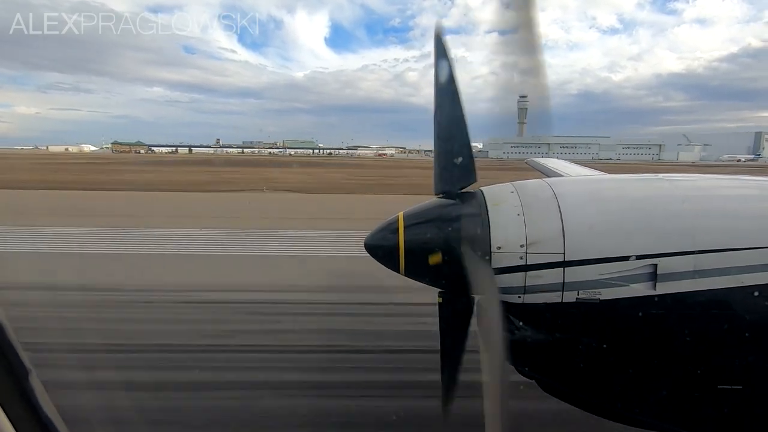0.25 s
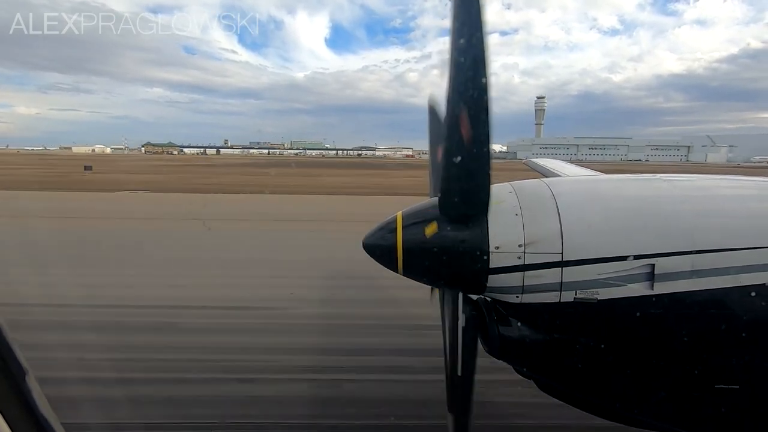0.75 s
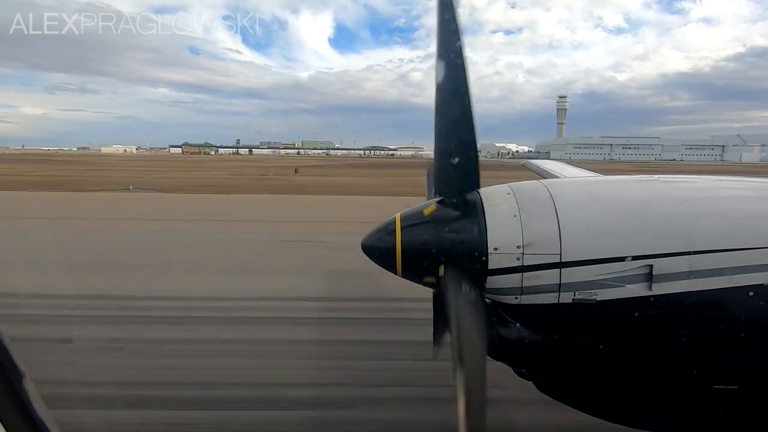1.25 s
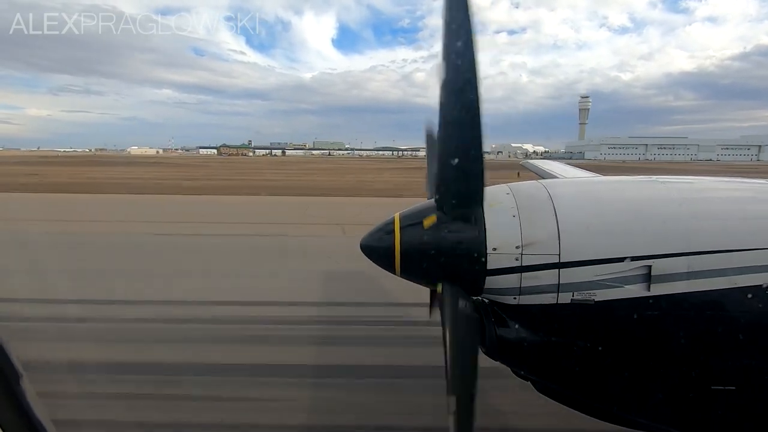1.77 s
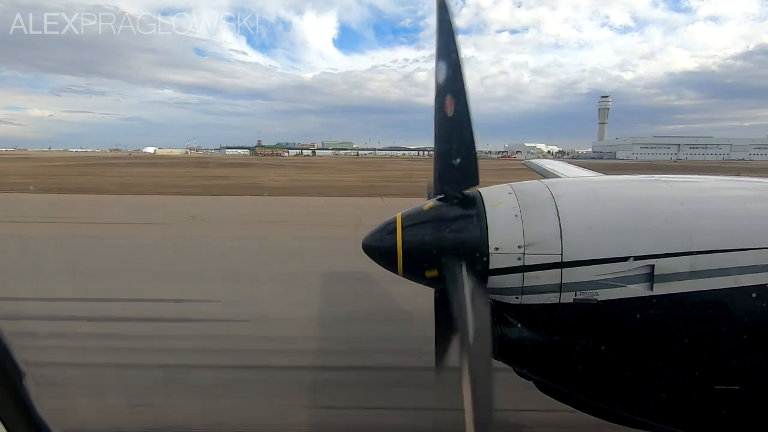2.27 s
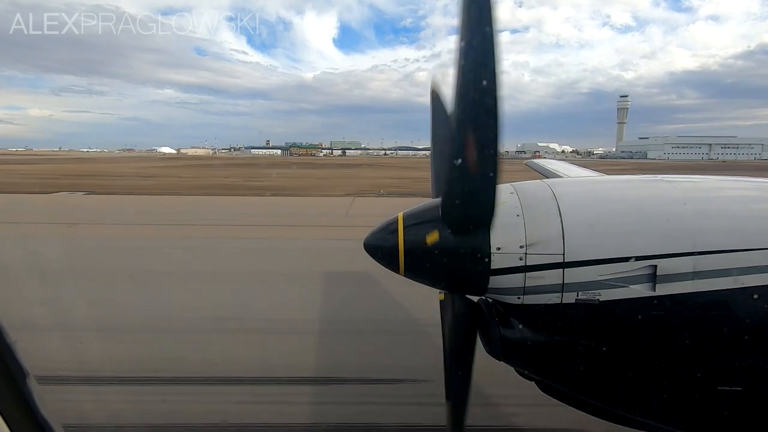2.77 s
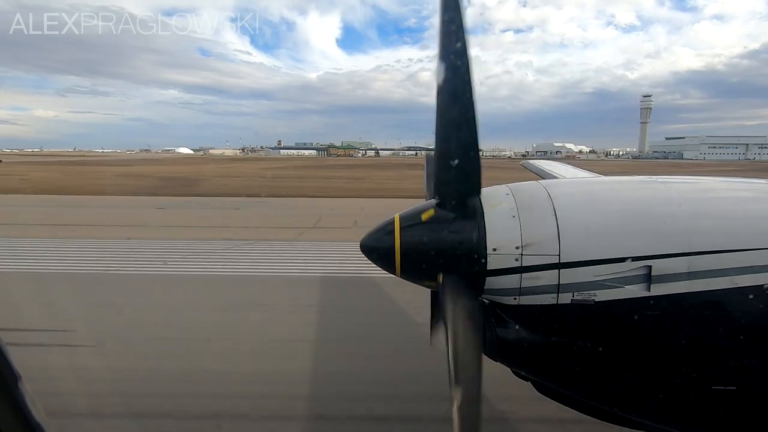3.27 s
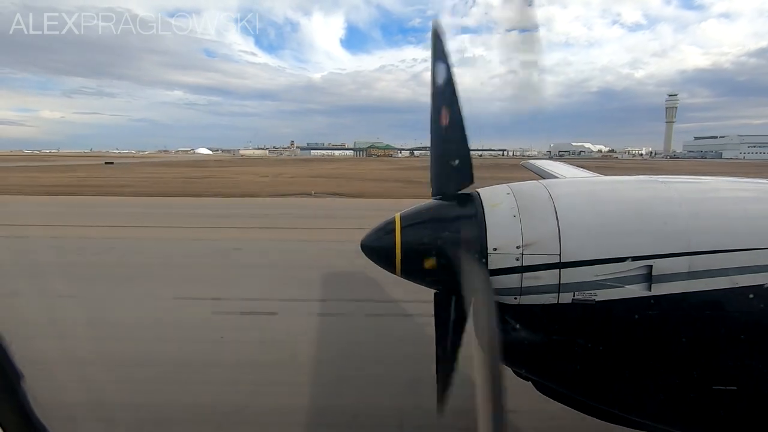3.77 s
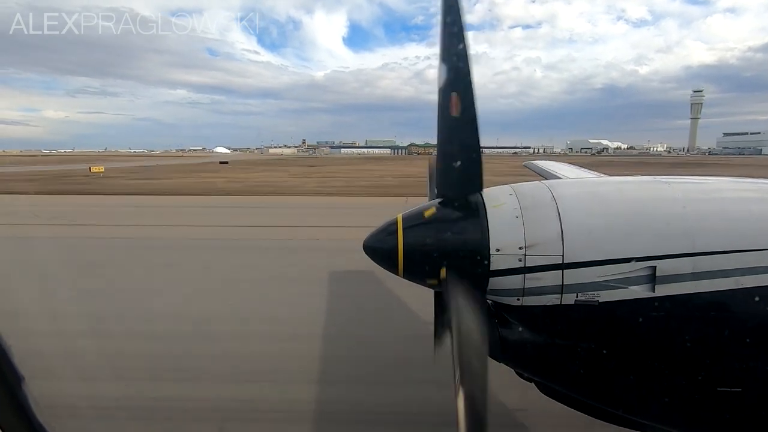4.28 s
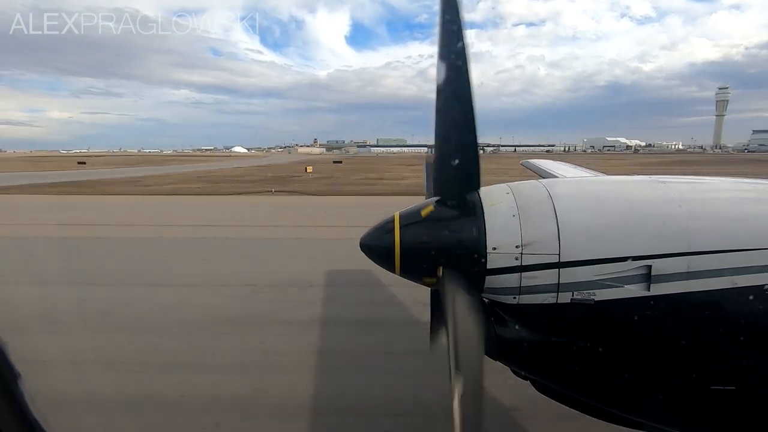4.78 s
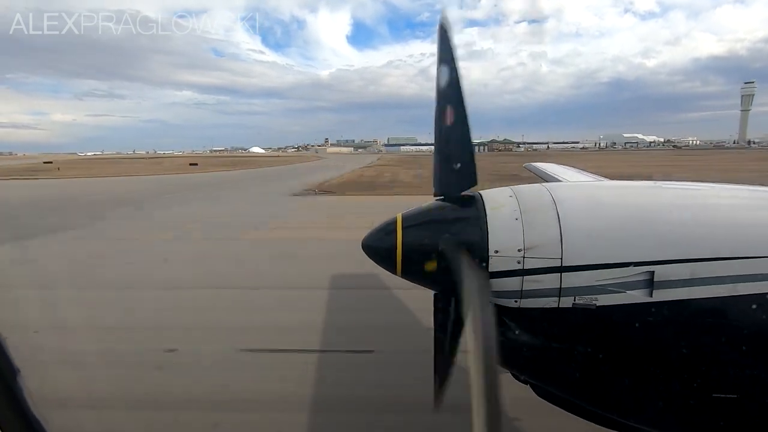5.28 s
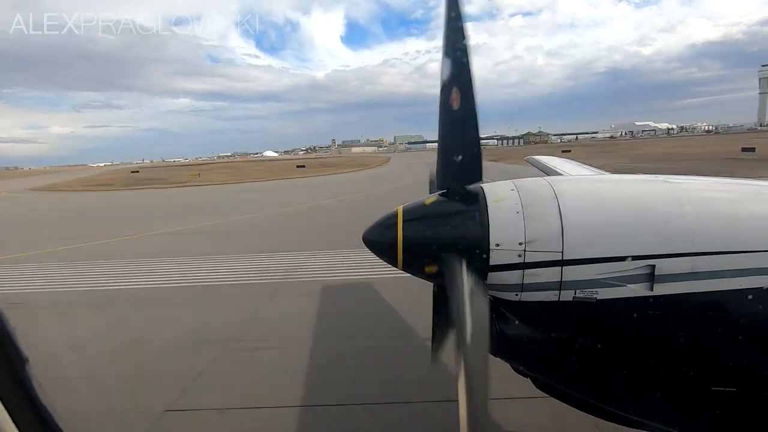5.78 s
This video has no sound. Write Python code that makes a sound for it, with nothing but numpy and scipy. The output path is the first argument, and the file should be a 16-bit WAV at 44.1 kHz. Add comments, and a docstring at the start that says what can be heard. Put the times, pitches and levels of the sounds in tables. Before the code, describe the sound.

Inside a taxiing twin turboprop, a loud, even propeller hum carries on above a low rumble and a soft hiss of air.

```python
"""A twin turboprop taxis at steady power, heard from the cabin beside one four-bladed propeller.
From the start blade pulses drum on the fuselage, the far propeller beats faintly against them, wheels
rumble and prop wash roars through the skin and hisses over the window in puffs. The trim buzzes at 0.2 s
and ticks at 0.5 s. Around 3 s the wash eases and a faint turbine whine comes through; near 4 s the wash
swells again, and the trim ticks once more at 4.9 s while the drone carries on."""
import sys
import numpy as np
from scipy import signal
from scipy.fft import rfft, irfft, next_fast_len
from scipy.io import wavfile
from scipy.ndimage import uniform_filter1d

SR = 44100
rng = np.random.default_rng(int(sys.argv[2]) if len(sys.argv) > 2 else 0)


def unload_wav(signal):
    """Save mono or channel-first audio to the path in sys.argv[1] as 16-bit WAV at rate SR, clipped to [-1, 1]."""
    wavfile.write(
        sys.argv[1],
        SR,
        np.round(np.clip(np.atleast_2d(signal).T, -1, 1) * 32767).astype(np.int16),
    )


N = 266364


# The near propeller's speed. Each row: time in seconds, blade passes per second.
BLADE_RATE = [(0, 92.57), (0.65, 92.73), (1, 92.54), (2.1, 92.48), (2.65, 92.88), (3.1, 92.57), (4, 92.51),
              (4.4, 91.88), (4.85, 91.98), (5.45, 92.83), (6.04, 92.15)]

def propellers():
    """Near blade rate in Hz, then running counts of near and far blade passes."""
    blade_hz = curve(BLADE_RATE)
    passes = 0.525 + np.cumsum(blade_hz) / SR   # the window starts between two blades
    hunting_hz = 0.38 * drift(0.4)   # the far engine hunts around the same speed
    return blade_hz, passes, passes + np.cumsum(hunting_hz) / SR


# Fader rides for the drone's partials 2, 3 and 4. Each row: time in seconds, relative level in dB.
SECOND_PARTIAL = [(0.0, -18.7), (0.94, -17), (1.59, -16.5), (2.08, -15), (2.65, -18.0), (4.45, -18),
                  (4.61, -17.5), (5.8, -18.5), (6.0, -21)]
THIRD_PARTIAL = [(0.0, -29.5), (0.24, -26), (0.73, -30.5), (1.55, -26.5), (1.88, -30.5), (2.12, -25.5),
                 (2.33, -25), (2.65, -29), (3.47, -27.5), (3.71, -25), (4.29, -29), (5.47, -25.0),
                 (6.0, -29)]
FOURTH_PARTIAL = [(0.0, -51.5), (1.14, -37), (1.47, -47.5), (1.96, -41), (3.35, -40), (3.92, -46.0),
                  (4.33, -56.7), (4.65, -42.5), (5.59, -57), (6.0, -39)]

def blade_drone(passes, flutter_db):
    """Each blade sends a pressure pulse; gusts shake its higher partials the most."""
    mean_hz = passes[-1] * SR / N
    rides = (SECOND_PARTIAL, THIRD_PARTIAL, FOURTH_PARTIAL)
    second, third, fourth = (curve(ride) + 0.2 for ride in rides)   # the cabin lifts these a little
    first = -12.5 - 0.47 * (second - second.mean())   # the fundamental ducks as the second grows
    drone = np.zeros(N)
    for k, db in enumerate((first, second, third, fourth), 1):
        gain = from_db(db + k * flutter_db * drift(27))
        drone += gain * tone(k * passes - cabin_lag(k * mean_hz))
    return drone


def cabin_lag(hz, mode_hz=216, width_hz=24):
    """Share of a cycle by which the cabin's air mode delays tones below it and advances those above."""
    return np.arctan(width_hz / 2 / (mode_hz - hz)) / np.pi


# Each propeller's faint tones. Each row: multiple of the shaft speed, relative level in dB.
SHAFT_TONES = [(1, -46.5), (2, -40), (3, -46.5), (6, -52), (11, -53), (20, -54), (24, -52.5), (32, -57),
               (40, -67.5), (44, -71), (56, -72.5)]

def shaft_hum(passes, waver_db, smear_cycles, blades=4):
    """Slightly unequal blades add weak, wavering tones at multiples of the shaft speed."""
    hum = np.zeros(N)
    for order, db in SHAFT_TONES:
        gain = from_db(db + waver_db * drift(0.83))
        hum += gain * tone(round(order) * passes / blades + smear_cycles * drift(6.6) + rng.random())
    return hum


# The pavement's roughness. Each row: time in seconds, relative rumble level in dB.
ROUGHNESS = [(0, -31), (0.75, -29.5), (1, -25.5), (1.3, -31.5), (1.65, -24.5), (2.2, -25), (3.1, -30),
             (3.4, -37.4), (4.2, -30.5), (5.6, -32.5), (6.04, -36.5)]
# The airframe's low resonances. Each row: pitch in Hz, width in Hz, gain in dB.
AIRFRAME_MODES = [(29.7, 3.3, -0.5), (45.4, 8.1, 0.5), (57.3, 18, -5.5)]

def wheels():
    """Rough pavement shakes the airframe: gives the rumble and its swing in dB about the average."""
    rough_db = curve(ROUGHNESS)
    shaking = resonate(noise([(16, 0), (65, 0)]), AIRFRAME_MODES)
    envelope = uniform_filter1d(shaking ** 2, size=SR // 4) ** 0.5
    steady = shaking / envelope   # the surface is even, with no single big bump
    return from_db(rough_db - 1.2) * steady, rough_db - rough_db.mean()


# The prop wash's strength on the window. Each row: time in seconds, relative level in dB.
WASH_RIDE = [(0, -52.5), (0.25, -53), (0.65, -56), (1.4, -54.5), (1.9, -55.0), (2.45, -57.5), (3.55, -57.5),
             (3.95, -53.9), (5.45, -55.5), (5.75, -56.5), (6.04, -56.5)]

def wash_surge():
    """The prop wash swells and eases, in dB about its average."""
    wash_db = curve(WASH_RIDE)
    return wash_db - wash_db.mean()


# EQ curves for the air, darkest to brightest. Each row: frequency in Hz, relative level in dB.
BOOM_EQ = [(25, -14.5), (60, -3.5), (110, 2), (150, -4.5), (195, -2), (240, -7), (330, -12.5), (430, -27),
           (600, -45)]
ROAR_EQ = [(250, -12), (370, 1.5), (440, -2), (550, 0), (650, 0.5), (730, -6.5), (820, -12), (940, -9.5),
           (1100, -14.5), (1400, -24.5), (2500, -43)]
HISS_EQ = [(700, -10.5), (1200, 1.5), (1650, 1), (2100, -1), (2600, -1.5), (3250, -3.5), (3600, -7.5),
           (5000, -16.5), (7000, -28), (10000, -40)]
SEAL_EQ = [(2500, -20), (3800, -5.5), (4300, 2.5), (4700, -3), (5000, -3.5), (5450, -10.5), (6200, -11.5),
           (7000, -18), (9000, -13), (10200, -34.5), (13000, -29), (15000, -42)]
SIZZLE_EQ = [(4000, -14), (6000, -4.5), (7200, -5.5), (7900, -1), (9300, -3), (10100, -15), (10700, -11),
             (11400, -19.5), (12800, -15.5), (15000, -30.5)]

def prop_wash(passes, surge_db, bumps_db):
    """Wash booms and roars through the skin; the window seal hisses twice in each pressure cycle."""
    gust = from_db(0.7 * drift(7.2))   # eddies in the wash stir all the hiss together
    boom = from_db(-32.5) * noise(BOOM_EQ)
    roar = from_db(-43 + 0.5 * surge_db + 0.12 * bumps_db) * noise(ROAR_EQ)   # rough pavement adds roar
    roar *= puffs(passes, lag=1.0, sharpness=1.3, depth=0.12)
    hiss = from_db(-56 + surge_db) * noise(HISS_EQ)
    hiss *= puffs(passes, lag=0.41, sharpness=0.6, depth=0.11)
    seal = from_db(-66.5 + 1.25 * surge_db) * noise(SEAL_EQ)
    seal *= puffs(passes, lag=0.41, sharpness=3, depth=0.65)
    grain = from_db(1.1 * drift(120))
    sizzle = from_db(-73.1 + 1.3 * surge_db) * noise(SIZZLE_EQ) * grain
    sizzle *= puffs(passes, lag=0.73, sharpness=5.5, depth=1.0)
    return boom + roar + gust * (hiss + seal + sizzle)


def puffs(passes, lag, sharpness, depth):
    """Unit-power tremolo with one swell per blade, `lag` cycles after the blade passes."""
    swell = np.exp(sharpness * (np.cos(2 * np.pi * (passes - lag)) - 1))
    return rms_one(1 + depth * swell)


# Cues for the loose trim; the shortest are single ticks.
# Each row: start in seconds, length in seconds, opening drive in dB.
BUZZ_CUES = [(0.208, 0.07, -45.5), (0.499, 0.005, -45.5), (4.914, 0.005, -53)]
# The trim's bright ring. Each row: pitch in Hz, width in Hz, gain in dB.
TRIM_MODES = [(2700, 900, 2), (4470, 700, 4.5), (6100, 520, 1), (8000, 600, 1), (9000, 690, -3.5)]

def trim_buzz(blade_hz, chatter_s, uneven_db, fade_db_per_s):
    """While a panel is loose each blade pulse makes it chatter for a few milliseconds, fading away."""
    t, force = np.arange(N) / SR, np.zeros(N)
    for start, length, db in BUZZ_CUES:
        for age in np.arange(0, length, 1 / blade_hz):
            touch = from_db(db - fade_db_per_s * age + uneven_db * rng.standard_normal())
            force += touch * (t >= start + age) * np.exp(-np.abs(t - start - age) / chatter_s)
    ringing = resonate(force * rng.standard_normal(N), TRIM_MODES)
    return signal.sosfilt(signal.butter(6, 9600, fs=SR, output="sos"), ringing)


# The compressors' tones. Each row: pitch in Hz, level in dB in an average wash, wander as a share of pitch.
COMPRESSOR_TONES = [(8495, -86.5, .0015), (8900, -91, .003)]

def turbine(surge_db, waver_db):
    """The compressors' thin whines barely get through the window, most when the wash eases."""
    whines = np.zeros(N)
    for hz, db, wander in COMPRESSOR_TONES:
        gain = from_db(db + waver_db * drift(4.3))
        pitch_hz = hz * (1 + wander * drift(25))
        whines += gain * tone(np.cumsum(pitch_hz) / SR)
    return from_db(-1.9 * surge_db) * whines


def from_db(db):
    """Decibels to gain."""
    return 10 ** (np.asarray(db) / 20)


def rms_one(x):
    """Scale to unit power."""
    return x / np.sqrt(np.mean(x ** 2) + 1e-20)


def curve(rows):
    """Automation line through (seconds, value) points, a value for every sample."""
    return np.interp(np.arange(N) / SR, *np.transpose(rows))


def tone(cycles):
    """Unit-power sinusoid from a count of cycles."""
    return np.sqrt(2) * np.cos(2 * np.pi * cycles)


def drift(rate_hz):
    """Smooth random wander with spread 1."""
    hop, settle = 40, 2000
    pole = np.exp(-2 * np.pi * rate_hz * hop / SR)
    white = rng.standard_normal(N // hop + settle + 2)
    slow = signal.lfilter([1], [1, -2 * pole, pole * pole], white)[settle:]
    return np.interp(np.arange(N) / hop, np.arange(len(slow)), rms_one(slow))


def noise(eq):
    """Unit-power noise shaped by an EQ curve, falling away steeply past its ends."""
    hz, db = np.transpose(eq)
    size = next_fast_len(N)
    bins_hz = np.maximum(np.arange(size // 2 + 1) * SR / size, 1)
    colour = from_db(np.interp(np.log(bins_hz), np.log(hz), db))
    skirts = np.minimum(1, np.minimum(bins_hz / hz[0], hz[-1] / bins_hz)) ** 3
    spectrum = rfft(rng.standard_normal(size)) * colour * skirts
    return rms_one(irfft(spectrum, size)[:N])


def resonate(x, modes):
    """Parallel resonances of alternating sign."""
    ringing = np.zeros(N)
    for k, (hz, width, db) in enumerate(modes):
        radius = np.exp(-np.pi * width / SR)
        zeros = np.array([1, 0, -1]) * (1 - radius ** 2) / 2
        poles = [1, -2 * radius * np.cos(2 * np.pi * hz / SR), radius ** 2]
        ringing += (-1) ** k * from_db(db) * signal.lfilter(zeros, poles, x + 1e-18)
    return ringing


def scene():
    """The mono mix at one seat: propellers in front, wheels and wash under them, small details behind."""
    blade_hz, passes, far_passes = propellers()
    surge_db = wash_surge()
    drone = blade_drone(passes, flutter_db=0.3247)
    near_hum = from_db(0.43 * surge_db) * shaft_hum(passes, waver_db=1.5, smear_cycles=0.075)
    far_hum = from_db(-8) * shaft_hum(far_passes, waver_db=0.5, smear_cycles=0.2)
    rumble, bumps_db = wheels()
    wash = prop_wash(passes, surge_db, bumps_db)
    whine = turbine(surge_db, waver_db=3)
    buzz = trim_buzz(blade_hz.mean(), chatter_s=0.0038, uneven_db=0.8, fade_db_per_s=45)
    return (drone + near_hum + far_hum + rumble + wash + buzz + whine)[None]


def record(dry):
    """A steep high cut takes off the very top, 70 dB down from 15.4 kHz."""
    high_cut = signal.cheby2(12, 70, 15400, fs=SR, output="sos")
    lead_in = 2 * dry[:, :1] - dry[:, 500:0:-1]   # settles the filter so the drone opens cleanly
    return signal.sosfilt(high_cut, np.hstack([lead_in, dry]))[:, -N:]


dry = scene()
out = record(dry)
unload_wav(out)
```